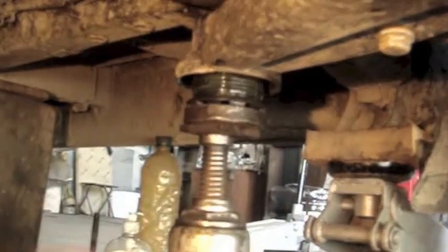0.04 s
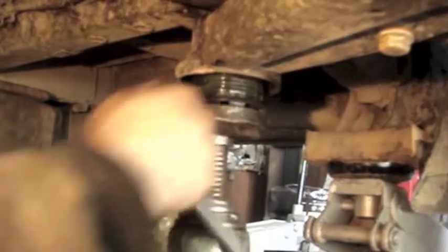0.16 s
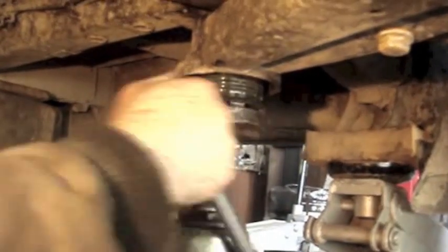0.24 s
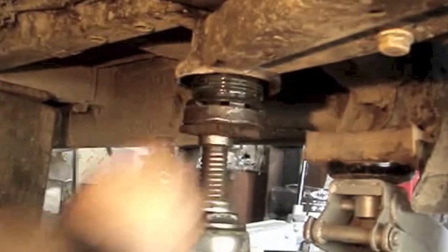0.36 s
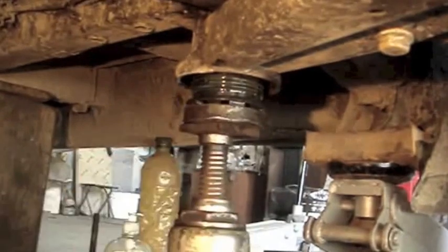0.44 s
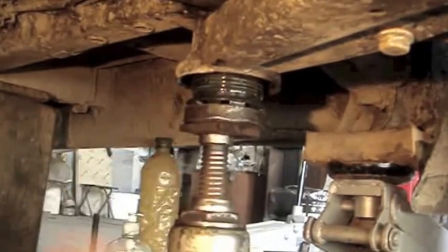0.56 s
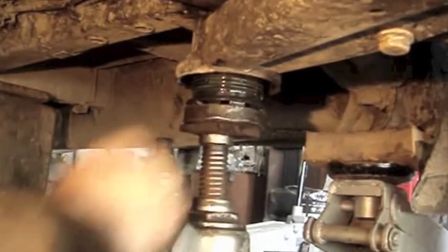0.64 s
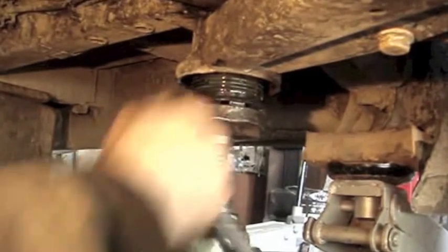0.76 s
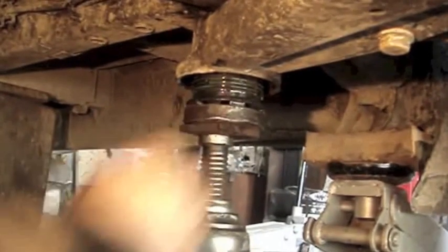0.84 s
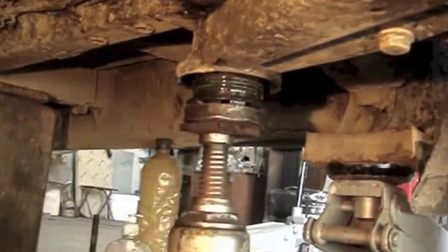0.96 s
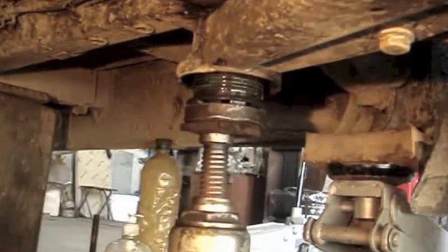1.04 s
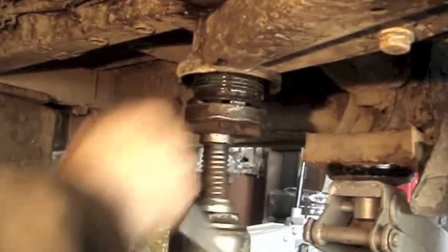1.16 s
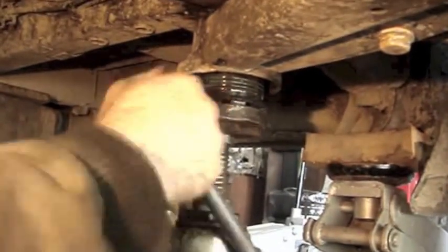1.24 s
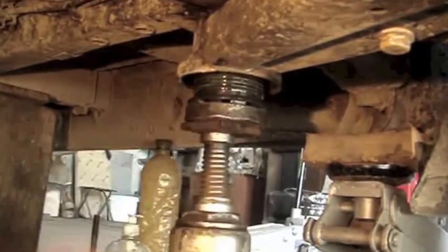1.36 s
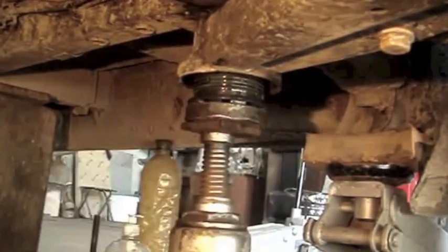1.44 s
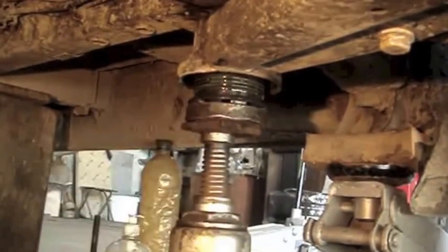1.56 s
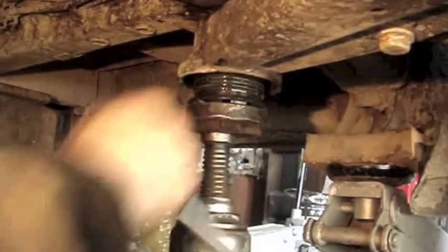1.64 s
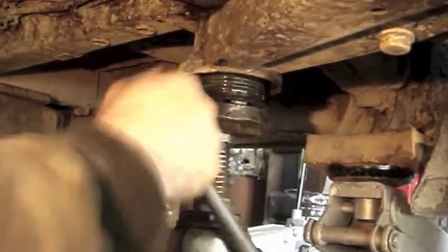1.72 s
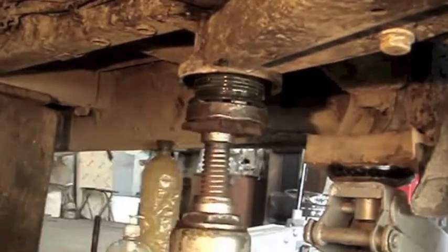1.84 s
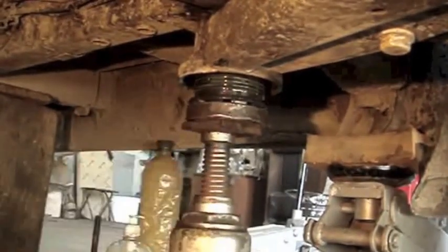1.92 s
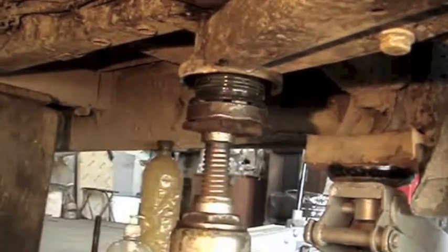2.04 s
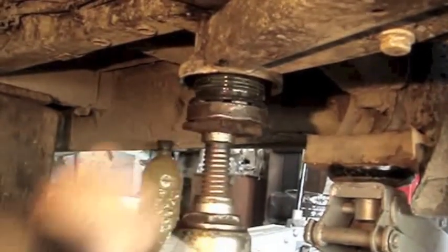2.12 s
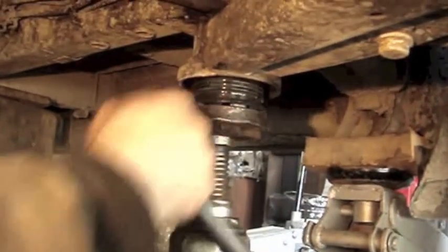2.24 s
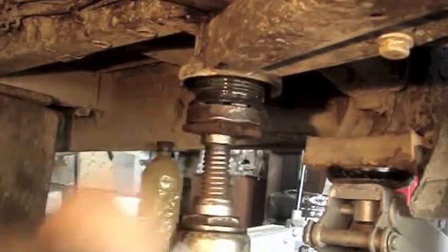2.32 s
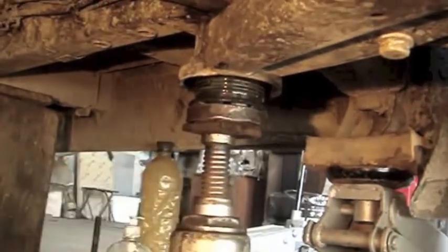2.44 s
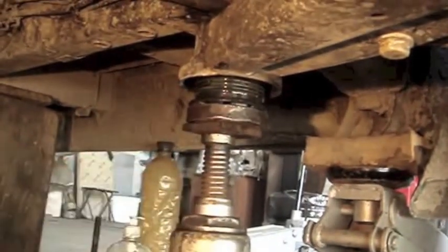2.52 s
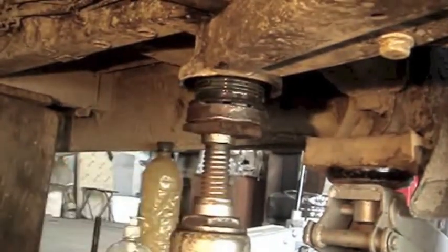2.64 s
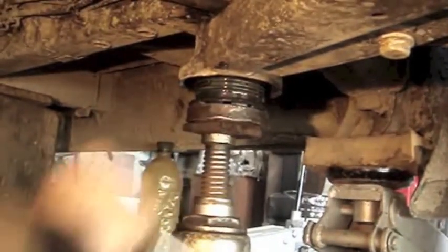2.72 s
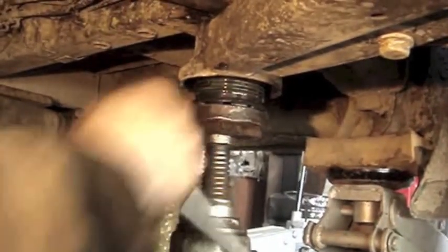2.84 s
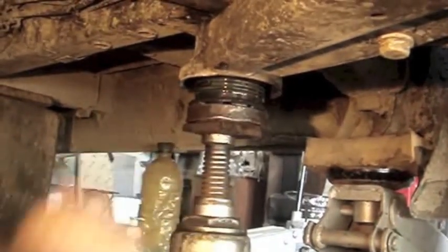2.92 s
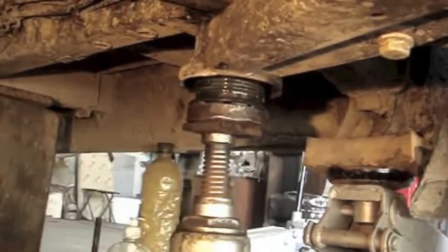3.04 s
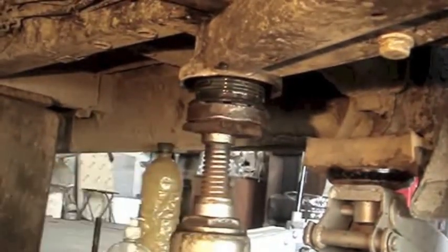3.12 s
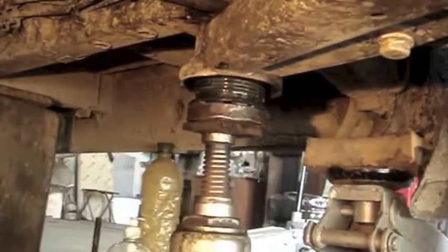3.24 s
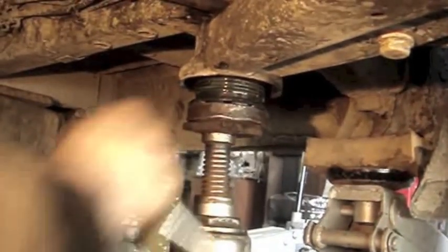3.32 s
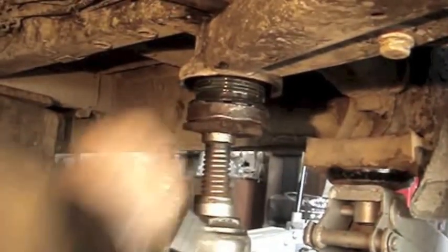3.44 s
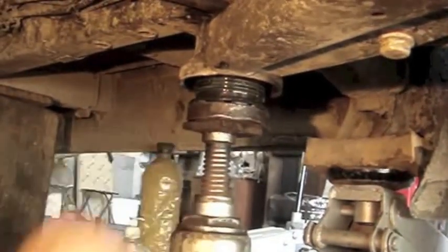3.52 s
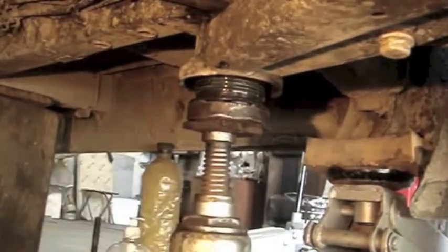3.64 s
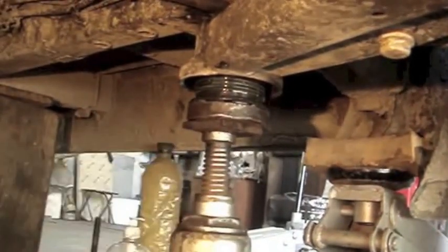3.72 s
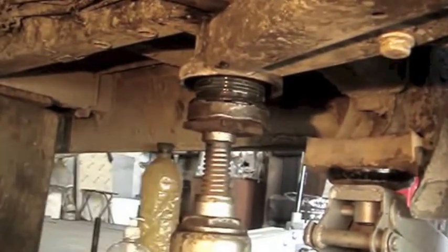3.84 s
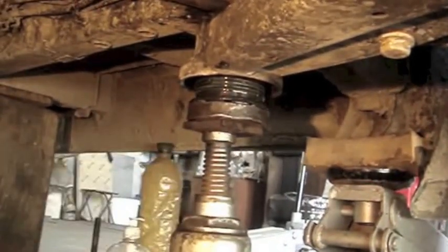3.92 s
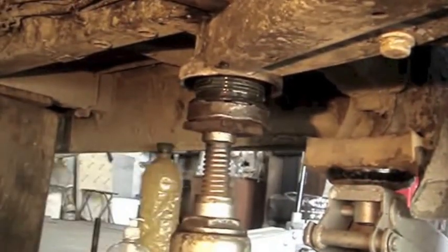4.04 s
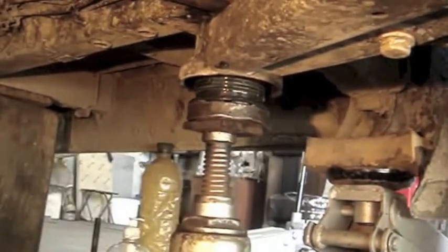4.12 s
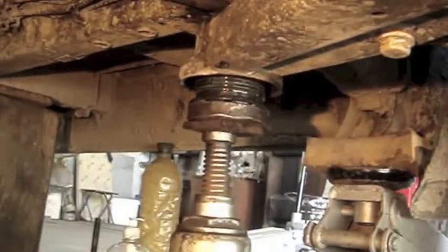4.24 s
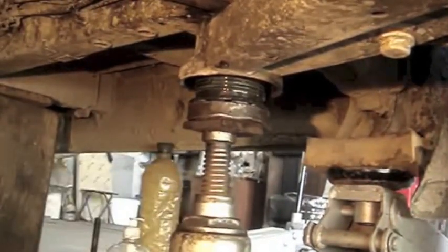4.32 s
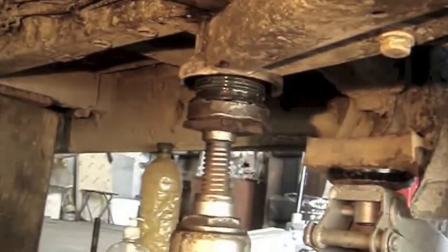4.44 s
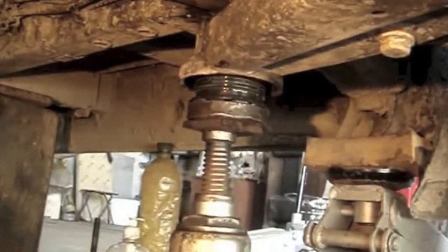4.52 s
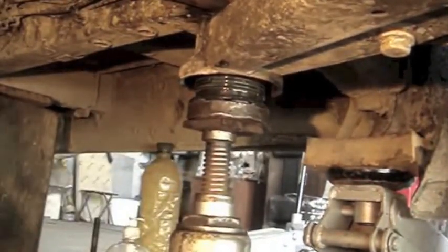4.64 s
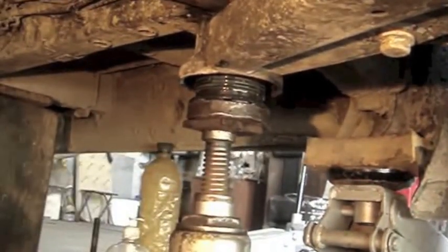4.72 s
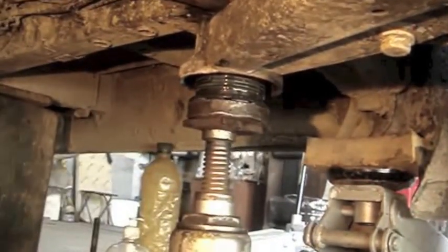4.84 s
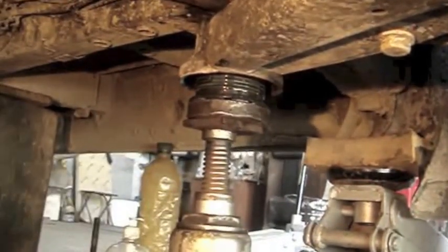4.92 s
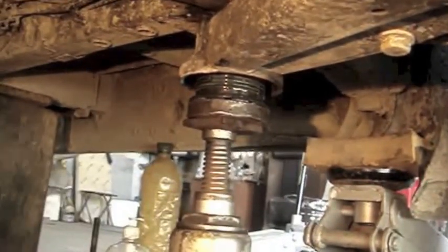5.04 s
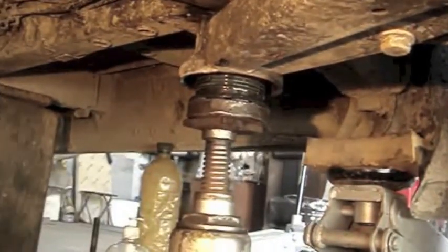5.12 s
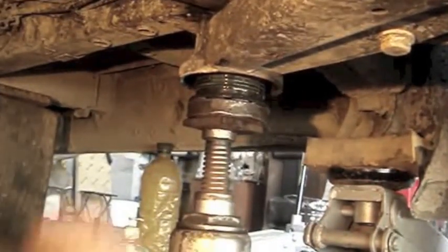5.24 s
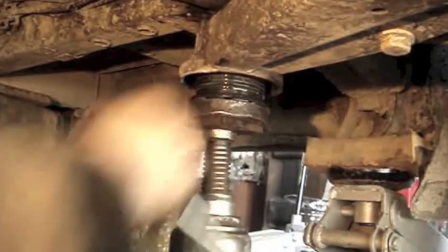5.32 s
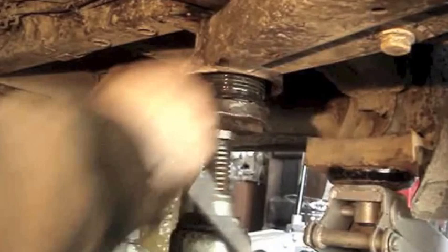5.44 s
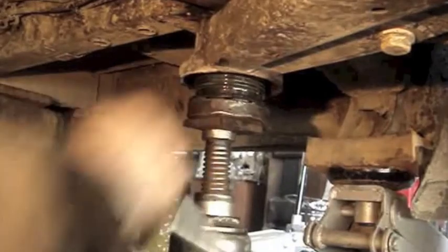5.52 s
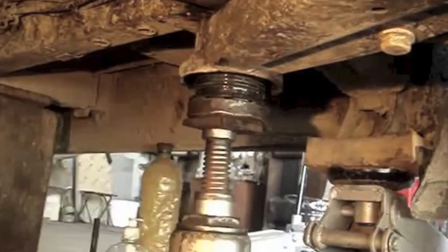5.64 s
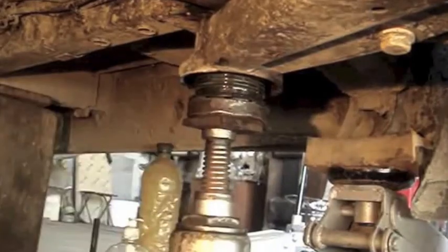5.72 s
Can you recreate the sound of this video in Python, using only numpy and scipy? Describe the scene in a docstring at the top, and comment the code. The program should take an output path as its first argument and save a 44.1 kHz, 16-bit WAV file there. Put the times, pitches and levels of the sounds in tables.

```python
"""Ratchet wrench on a puller

A ratchet wrench winds the screw of a puller under a vehicle in a workshop. At each swing the socket
clacks in its play, the pawl snaps over two teeth and drags, the head rattles and the screw knocks.
Impacts excite the modes of wrench and puller; a low boom rings under the first and last swings. A sleeve
brushes past, the tool rubs, the room reverberates over rumble and hiss, and a limiter ducks the peaks."""
import sys
import numpy as np
from scipy import signal
from scipy.fft import rfft, irfft, next_fast_len
from scipy.io import wavfile
from scipy.ndimage import uniform_filter1d, minimum_filter1d, map_coordinates

SR = 44100
rng = np.random.default_rng(int(sys.argv[2]) if len(sys.argv) > 2 else 0)


def generate_wav(sig):
    """Save sig (samples, or channels by samples) to the path in sys.argv[1] as 16-bit PCM at SR."""
    pcm = np.round(np.clip(np.atleast_2d(sig).T, -1, 1) * 32767).astype(np.int16)
    wavfile.write(sys.argv[1], SR, pcm)


N = 254888

# Workshop background. Each row: time in seconds, rumble level in dB, hiss level in dB.
BACKGROUND_LEVELS = [(0, -49, -44), (.3, -44.5, -47.5), (.62, -57.5, -50), (1.7, -56.5, -57),
                     (3.95, -60, -59.5), (4.7, -47, -52.5), (5.25, -47.5, -53.5), (5.78, -41, -46.5)]
# Hum and whine. Each row: frequency in Hz, level in dB relative to the rumble.
HUM_PARTIALS = [(97, -7.5), (187, -5.5), (7580, -19)]
# Noise spectra. Each row: frequency in Hz, relative spectral density in dB.
RUMBLE_SPECTRUM = [(25, -0.5), (48, 0.5), (70, -10.5), (100, 1), (180, -4.5), (300, -1), (500, -2),
                   (750, -5.5), (1400, -15), (3000, -35.5)]
HISS_SPECTRUM = [(410, -31), (700, -10), (1480, -12), (1810, -12.5), (2490, -16), (3380, -16.5),
                 (4240, -18.5), (7820, -23.5), (10000, -31), (10500, -53.5), (13600, -80.5), (22000, -120)]
SLEEVE_SPECTRUM = [(30, -28), (65, -9), (90, 7.5), (125, -4), (190, -4), (260, -17), (600, -46),
                   (2000, -58)]
RUB_SPECTRUM = [(600, -20), (1400, -13), (1700, 9), (2200, -32), (2900, -14), (3400, 0), (3900, -14),
                (4300, -13), (5200, -43), (10000, -35)]
# Impacts on socket and screw. Each row: start in seconds, level in dB.
SOCKET_CLACKS = [(0.1471, -6), (.189, -17), (.2344, -25), (0.6673, -11), (.673, -7), (0.6954, -11.5),
                 (0.7024, -15), (1.1931, -3), (1.6375, -10.5), (1.6523, -11), (1.6801, -6.5),
                 (2.1442, -12.5), (2.157, -9.5), (2.186, -8.5), (2.7525, -11), (2.7656, -8.5),
                 (3.334, -16.5), (3.3425, -6.5), (3.3672, -14.5), (5.3104, 6), (5.334, -5), (5.3616, -6),
                 (5.5141, -13)]
SCREW_KNOCKS = [(.5365, -9.5), (1.038, -8), (1.5422, -18), (2.0022, -16.5), (2.5437, -11), (2.8192, -34.5),
                (3.1225, -12.5), (3.3944, -41), (3.7164, -17), (4.5532, -40.5), (4.727, -59), (5.743, -24)]
# Low ringing booms under the first and last swings. Each row: start in seconds, level in dB.
LOW_BOOMS = [(.442, -35.5), (5.349, -22.5), (5.62, -26)]
# Pawl snaps in pairs. Each row: first and second start in seconds, first and second level in dB.
TOOTH_PAIRS = [(.378, .391, -1, -13), (.8065, .8325, -1, 0), (1.3262, 1.3516, 0, 0), (1.7825, 1.8075, 0, 0),
               (2.291, 2.3185, -4, 0), (2.8888, 2.9072, -2, 0), (3.4565, 3.4785, -1, 0),
               (5.459, 5.48, -18, 0)]
# Quick runs of the head. Each row: start, time of the hardest snap and length in seconds,
# level in dB, offset of the puller's share in dB.
HEAD_RUNS = [(0.4164, 0.4454, .042, -7, -1.5), (0.916, 0.9402, 0.038, -10.5, -2),
             (1.422, 1.4424, 0.032, -11, -4.5), (1.878, 1.9014, 0.039, -9.5, -2.5),
             (2.4026, 2.408, 0.027, -7.5, -3.5), (2.9785, 2.9832, 0.024, -8, -2),
             (3.56, 3.566, .018, -9.5, -0.5), (5.322, 5.3477, 0.027, -8.5, 2),
             (5.5745, 5.6127, 0.048, -6, 3.5)]
# Rubbing under load. Each row: start in seconds, length in seconds, level in dB.
RUB_STROKES = [(4.12, 0.2, -58), (4.56, 0.37, -56.5)]
# Normal modes. Each row: frequency in Hz, relative level in dB, time to decay by 60 dB in seconds.
WRENCH_MODES = [(4350, -3, .055), (4460, -7, .04), (4600, -3, .045), (4740, 0, .065), (4830, -3, .045),
                (4980, -8, .035), (6120, -6, .045), (6330, -10, .04), (6620, -11, .035), (6960, -11, .04),
                (8400, -16, .04), (8850, -14, .04), (9800, -12, .04)]
PULLER_MODES = [(317, -16, .15), (640, -8, .1), (800, -8, .09), (1140, -4, .08), (1225, -7, .1),
                (1495, 0, .09), (1880, -6, .06), (2390, -3, .07), (2565, -2, .07), (2830, -4, .06),
                (3150, -1, .07), (4220, -4, .05)]
BOOM_MODES = [(90, -8, .4), (154.4, -2, 0.46), (224.6, 5.5, .15), (331, 1, 0.27), (436, 0, 0.24),
              (524, -1, .3)]
# Spectra of the contacts and the puller's body. Each row: frequency in Hz, relative density in dB.
SOCKET_SPECTRUM = [(300, -24.5), (1200, -10), (2000, -7.5), (2500, 1.5), (3700, -5.5), (4500, -8),
                   (5400, -8), (6300, -6.5), (7500, -13), (10000, -17)]
PAWL_SPECTRUM = [(300, -1), (1500, -18), (3000, -7.5), (4000, 0.5), (4700, 13), (5500, -6), (6500, -2.5),
                 (7700, -7.5), (10000, -11)]
RUN_SPECTRUM = [(300, -27.5), (1200, -9.5), (2200, -8.5), (3100, 2.5), (3900, -5), (4600, 1.5), (5500, -5),
                (6600, 2), (7400, -9.5), (10000, -13)]
SCREW_SPECTRUM = [(300, 0), (1200, 3.5), (2400, -9), (3700, 1.5), (4400, 5), (5500, -3), (7000, -9.5),
                  (10000, -15)]
BODY_SPECTRUM = [(40, -32.5), (130, -14.5), (300, -13.5), (650, 0), (950, -4.5), (1400, 0.5), (2100, -1.5),
                 (3500, -8), (8000, -35)]
# Decay of the room. Each row: frequency in Hz, reverberation time in seconds.
ROOM_DECAY = [(100, 0.66), (500, 0.4), (2000, 0.26), (5000, 0.32), (10000, 0.52)]
# Colour of the reverberation. Each row: frequency in Hz, relative gain in dB.
ROOM_SPECTRUM = [(100, 0), (500, 9.5), (1500, 8), (3000, 7.5), (5000, -1.5), (10000, -24)]


def amp(db):
    """Amplitude ratio of a level in decibels."""
    return 10 ** (np.asarray(db) / 20)


def unit(x):
    """Normalisation to an rms of 1."""
    return x / np.sqrt(np.mean(x ** 2) + 1e-20)


def along(points, hz):
    """Interpolation of (Hz, value) points on a logarithmic frequency axis."""
    knots_hz, values = np.transpose(points)
    return np.interp(np.log(hz + 1), np.log(knots_hz + 1), values)


def wobble(rate_hz):
    """Slow modulation: a spline through random values drawn at the given rate."""
    knots = rng.standard_normal(int(N * rate_hz / SR) + 4)
    return map_coordinates(knots, [np.arange(N) * rate_hz / SR])


def add(track, s, sound):
    """Superposition of a sound on a track, from s seconds on."""
    start = max(round(s * SR), 0)
    track[start:start + len(sound)] += sound[:max(len(track) - start, 0)]


def coloured(x, spectrum, size=4096):
    """Spectral shaping by a minimum-phase filter of unit energy."""
    cepstrum = irfft(np.log(amp(along(spectrum, np.fft.rfftfreq(size, 1 / SR)))))
    cepstrum[1:size // 2] *= 2
    cepstrum[size // 2 + 1:] = 0
    response = irfft(np.exp(rfft(cepstrum)))
    return signal.fftconvolve(x, response / np.linalg.norm(response))[:N]


def background(waver_db=2):
    """Broadband rumble and hiss swell slowly, with faint tones that waver in amplitude and phase."""
    times, *levels = np.transpose(BACKGROUND_LEVELS)
    t = np.arange(N) / SR
    rumble_db, hiss_db = (np.interp(t, times, level) for level in levels)
    hum = sum(amp(db + waver_db * wobble(0.93)) * np.sin(2 * np.pi * hz * t + 1.2 * wobble(5.4))
              for hz, db in HUM_PARTIALS)
    rumble = coloured(rng.standard_normal(N), RUMBLE_SPECTRUM)
    hiss = amp(1.1 * wobble(9)) * coloured(rng.standard_normal(N), HISS_SPECTRUM)
    return amp(rumble_db) * (rumble + hum) + amp(hiss_db) * hiss


def friction(strokes, spectrum):
    """Sliding friction radiates noise that swells and fades over each stroke."""
    t = np.arange(N) / SR
    envelope = sum(amp(db) * np.sin(np.pi * np.clip((t - s) / length, 0, 1)) for s, length, db in strokes)
    return envelope * coloured(rng.standard_normal(N), spectrum)


def sleeve(start_s=0.084, length_s=0.29, db=-44.5):
    """Cloth friction: a low rumble as the arm sweeps close past the microphone."""
    return friction([(start_s, length_s, db)], SLEEVE_SPECTRUM)


def ring(modes, t, scatter_db=3.0, detune=0.0097):
    """Free vibration is a sum of damped modes, weighted and detuned anew at each excitation."""
    hz, db, t60 = np.transpose(modes)[:, :, None]
    hz = hz * (1 + detune * rng.standard_normal(hz.shape))
    weight = amp(db + scatter_db * rng.standard_normal(hz.shape))
    phase = rng.uniform(0, 2 * np.pi, hz.shape)
    partials = weight * amp(-60 * t / t60) * np.sin(2 * np.pi * hz * t + phase)
    return np.sum(partials, axis=0) / np.linalg.norm(weight)


def chatter(t, t60, grit_db):
    """Micro-impacts of steel on steel merge into a decaying burst of uneven noise."""
    grains = unit(uniform_filter1d(rng.standard_normal(len(t)), size=40))
    return unit(rng.standard_normal(len(t)) * amp(grit_db * grains)) * amp(-60 * t / t60)


def clink(t, t60, low_hz=1000, high_hz=10000, count=36):
    """Small loose parts resonate briefly, at frequencies that change with each contact."""
    return ring([(hz, 0, t60) for hz in rng.uniform(low_hz, high_hz, count)], t)


def lead_in(t, lead_s, rise_db=12):
    """Onset shaping: a very short rise of noise softens each hit's attack."""
    return np.where(t < lead_s, amp(rise_db * (t / lead_s - 2)), 0) * rng.standard_normal(len(t))


def bounces(sound, gap, loss_db, count=4):
    """Inelastic rebounds repeat a sound at uneven intervals, weaker each time."""
    out = sound.copy()
    for k, s in enumerate(np.cumsum(gap * rng.uniform(0.27, 7.2, count))):
        add(out, s, amp(loss_db * (k + 3)) * sound)
    return out


def blows(rows, share_db, dulling):
    """Energy partition: each (s, dB) blow gains the puller's share in dB, larger for softer blows."""
    return [(s, db, share_db - dulling * db) for s, db in rows]


def contacts(rows, spectrum, crack_t60, grit_db, wrench_db, body_db, body_t60, puller_db, gap, loss_db):
    """Impact excitation: each contact cracks, rings the wrench and shakes the heavier puller."""
    lead_s, bite_s, swell_s = 0.0013, 0.00053, 0.0014
    lead_ins, body, steel = np.zeros((3, N))
    t = np.arange(SR // 8) / SR
    bite = 1 - np.exp(-t / bite_s)
    swell = 1 - np.exp(-t / swell_s)  # inertia slows the heavy parts
    for s, db, share_db in rows:
        snap = amp(-2) * chatter(t, t60=0.0096, grit_db=-3)
        clatter = amp(2) * clink(t, crack_t60) + amp(-6) * chatter(t, crack_t60, grit_db)
        crack = unit(coloured(bite * (snap + clatter), spectrum)[:len(t)])
        add(lead_ins, s - lead_s, amp(db - 25.5) * lead_in(t, lead_s))
        add(steel, s, amp(db - 16) * crack)
        head = unit(bite * bounces(ring(WRENCH_MODES, t), gap, loss_db))
        add(steel, s, amp(db + wrench_db - 19.5) * head)
        add(body, s, amp(db + share_db + body_db) * swell * chatter(t, body_t60, grit_db))
        add(steel, s, amp(db + share_db + puller_db) * swell * ring(PULLER_MODES, t))
    return steel + coloured(lead_ins, spectrum) + coloured(body, BODY_SPECTRUM)


def socket():
    """Backlash: the loose socket crosses its play and stops with a clack."""
    rows = blows(SOCKET_CLACKS, share_db=-26.5, dulling=0.66)
    return amp(-6.5) * contacts(rows, SOCKET_SPECTRUM, crack_t60=0.039, grit_db=0, wrench_db=2.5,
                                body_db=0, body_t60=0.18, puller_db=2.5, gap=0.0024, loss_db=-27.5)


def room(x, delay_s=0.004):
    """Reverberation: convolution with a noise tail whose decay time depends on frequency."""
    hz, t, bands = signal.stft(rng.standard_normal(SR * 3 // 4), SR, nperseg=256)
    decay = amp(-60 * t / along(ROOM_DECAY, hz)[:, None])
    tail = signal.istft(bands * decay, SR, nperseg=256)[1]
    response = np.pad(tail, (int(delay_s * SR), 0)) / np.linalg.norm(tail)
    return coloured(signal.fftconvolve(x, response)[:N], ROOM_SPECTRUM)


def jingle(count=6, length_s=0.1, relative_db=-26, fade_db=9):
    """Secondary impacts: the loose socket ticks ever more faintly after each clack."""
    out, t = np.zeros(N), np.arange(SR // 20) / SR
    for s, db in SOCKET_CLACKS:
        for progress in (np.arange(count) + rng.random(count)) / count:
            tick = clink(t, t60=0.025, low_hz=3500, count=8) + amp(-3) * chatter(t, t60=0.02, grit_db=4)
            tick_db = db + relative_db - fade_db * progress + rng.normal(0, 3)
            add(out, s + length_s * progress, amp(tick_db) * tick)
    return out


def pawl():
    """Brief, hard impacts excite the head's high modes as the pawl snaps over two teeth."""
    snaps = []
    for first, second, first_db, second_db in TOOTH_PAIRS:
        snaps += [(first, first_db), (second, second_db)]
    rows = blows(snaps, share_db=-28, dulling=0.74)
    return amp(-10.5) * contacts(rows, PAWL_SPECTRUM, crack_t60=0.027, grit_db=3, wrench_db=1,
                                 body_db=-3, body_t60=0.13, puller_db=6, gap=0.00097, loss_db=-9)


def jolts_and_booms(push_s=0.01115, rise_s=0.0032):
    """Low transients: snaps land with a jolt, and damped modes boom under the first and last swings."""
    out, t = np.zeros(N), np.arange(SR // 2) / SR
    push = (1 - t / push_s) * np.exp(-t / push_s)
    jolt = amp(15) * push * (1 - np.exp(-t / rise_s)) ** 2
    for first, second, first_db, second_db in TOOTH_PAIRS:
        add(out, first, amp(first_db - 49) * jolt)
        add(out, second, amp(second_db - 42) * jolt)
    for _, snap, _, db, _ in HEAD_RUNS:
        add(out, snap, amp(db - 30) * jolt)
    for s, db in LOW_BOOMS:
        add(out, s, amp(db) * (1 - np.exp(-t / 0.0035)) * ring(BOOM_MODES, t))
    return out


def drag(count=12, wait_s=0.018, length_s=0.048, db=-31, fade_db=5):
    """Stick-slip: after its second snap the pawl stutters along a tooth, each slip ringing the head."""
    out, t = np.zeros(N), np.arange(SR // 10) / SR
    for _, second, _, _ in TOOTH_PAIRS:
        for progress in (np.arange(count) + rng.random(count)) / count:
            tick = ring(WRENCH_MODES, t) + amp(-4) * clink(t, t60=0.015, low_hz=5540, count=4)
            add(out, second + wait_s + length_s * progress, amp(db - fade_db * progress) * tick)
    return out


def rattle(count=7, fade_db=4, share_rise_db=13):
    """An impact train with one hard snap: as the head spins back, vibration passes into the puller."""
    rows, index = [], np.arange(count)
    for start, snap, length, db, offset_db in HEAD_RUNS:
        jitter = rng.uniform(-0.4, 0.4, count) * (index > 0)
        progress = (index + jitter) / (count - 1)
        steel_db = db - fade_db * progress + rng.standard_normal(count)
        share_db = offset_db - 17.5 + share_rise_db * progress
        rows += zip(start + length * progress, steel_db, share_db)
        rows.append((snap, db + 9.5, offset_db - 24))  # the hardest snap stays mostly in the head
    return amp(-6.5) * contacts(rows, RUN_SPECTRUM, crack_t60=0.031, grit_db=2.5, wrench_db=-2.5,
                                body_db=5.5, body_t60=0.071, puller_db=3, gap=0.0042, loss_db=-14.5)


def screw():
    """Impacts under load: the screw's knocks couple strongly to the puller and sound duller."""
    rows = blows(SCREW_KNOCKS, share_db=-11.5, dulling=0.52)
    return amp(-6.5) * contacts(rows, SCREW_SPECTRUM, crack_t60=0.024, grit_db=4.5, wrench_db=-6,
                                body_db=2.5, body_t60=0.074, puller_db=1, gap=0.005, loss_db=-10)


def rubbing():
    """Friction in the loaded tool gives faint bands of noise while the handle is pulled."""
    return friction(RUB_STROKES, RUB_SPECTRUM)


def scene():
    """Superposition of the tool, its reverberation and the other sources in one channel."""
    tool = socket() + jingle() + pawl() + rattle() + screw() + drag()
    reverberation = amp(-17) * room(tool)
    return (tool + reverberation + jolts_and_booms() + sleeve() + rubbing() + background())[None]


def record(dry, ceiling_db=-4, release_db_per_s=250, smooth_samples=60, cutoff_hz=10050):
    """Peak limiting ducks the loudest snaps; a steep low-pass filter then limits the bandwidth."""
    excess_db = np.maximum(20 * np.log10(np.abs(dry) + 1e-9) - ceiling_db, 0)
    ramp_db = release_db_per_s * np.arange(N) / SR
    duck_db = np.maximum.accumulate(excess_db + ramp_db, axis=-1) - ramp_db
    gain = uniform_filter1d(minimum_filter1d(amp(-duck_db), smooth_samples), smooth_samples)
    size = next_fast_len(N + SR // 4)
    lowpass = 1 / (1 + (np.fft.rfftfreq(size, 1 / SR) / cutoff_hz) ** 70)
    return irfft(rfft(dry * gain, size) * lowpass, size)[..., :N]


dry = scene()
out = record(dry)
generate_wav(out)
```